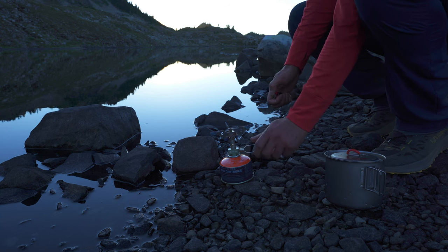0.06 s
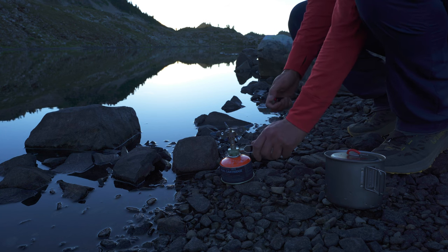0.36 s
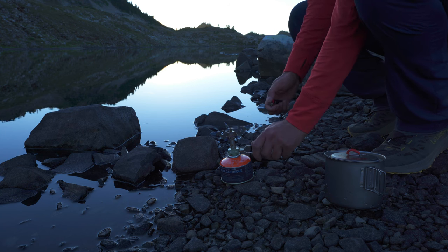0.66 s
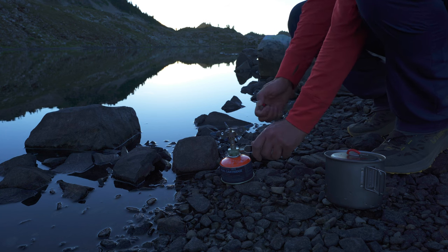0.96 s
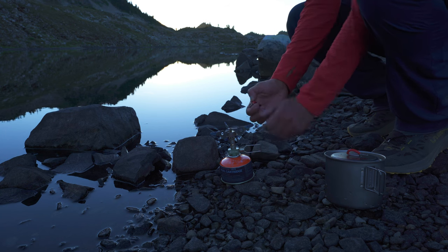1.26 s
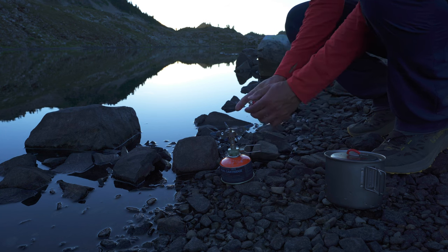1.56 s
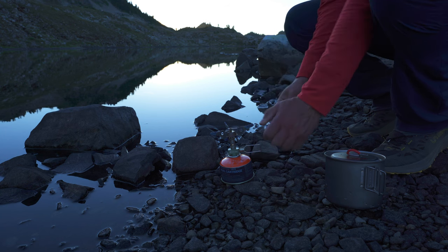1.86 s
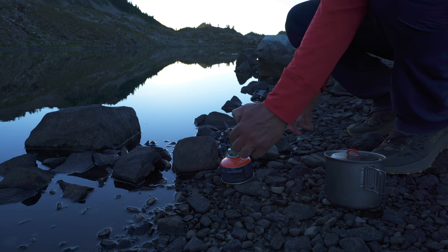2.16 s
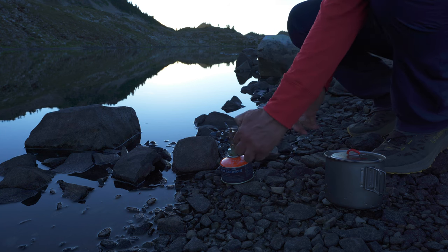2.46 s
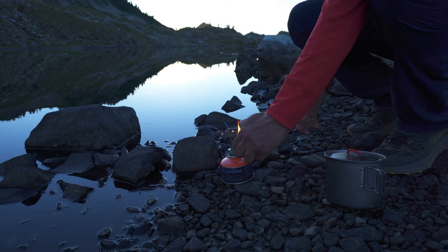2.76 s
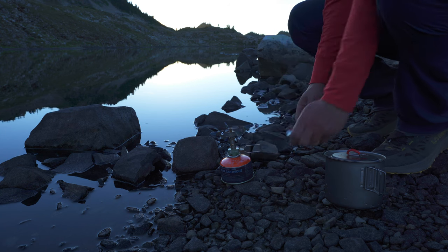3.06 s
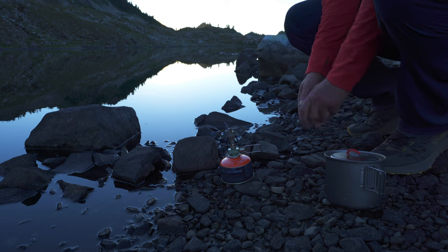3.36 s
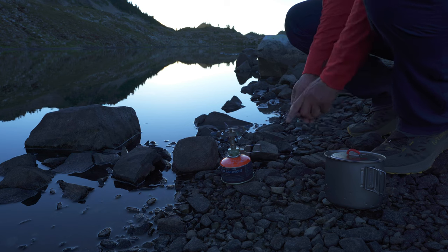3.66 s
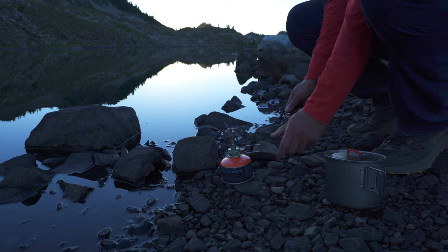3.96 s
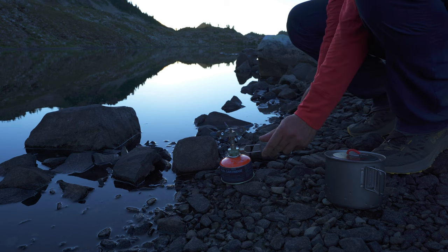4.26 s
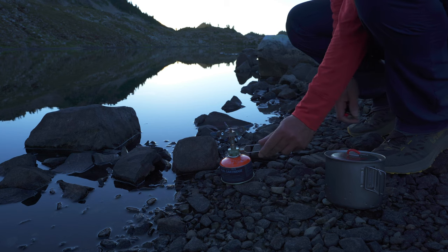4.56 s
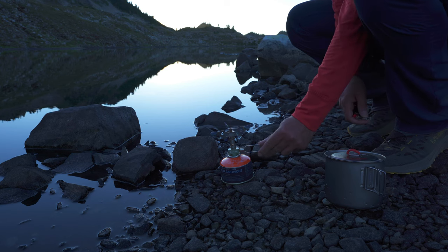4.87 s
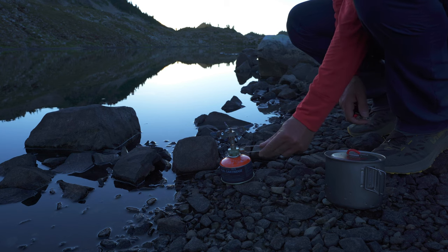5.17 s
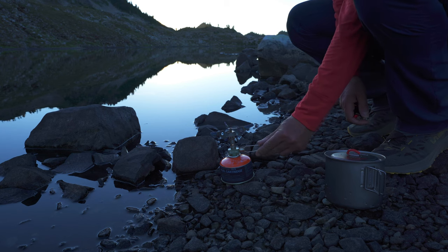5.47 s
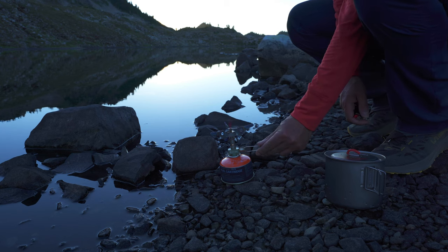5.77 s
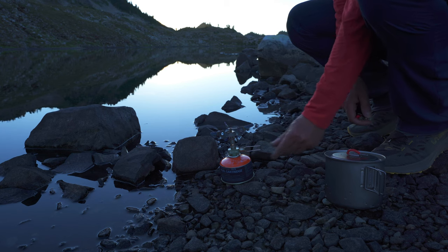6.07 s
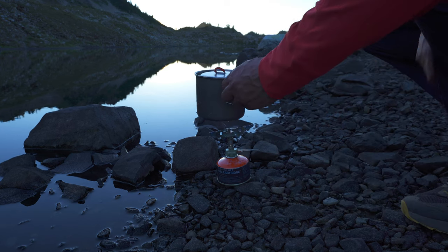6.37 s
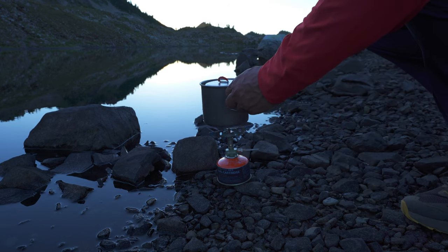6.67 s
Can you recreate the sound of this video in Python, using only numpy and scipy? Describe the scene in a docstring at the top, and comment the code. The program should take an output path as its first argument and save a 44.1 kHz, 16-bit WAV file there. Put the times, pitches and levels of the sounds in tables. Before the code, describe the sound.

Close to the microphone in a quiet outdoor spot, a camping stove starts hissing after a brief rustle of clothes, small stone clicks and a knock from its valve. One sharp lighter snap sets the gas alight with a quick flutter of puffs. The flame settles into a fuller, steady rush with a soft roar and slight sputter, its tone shifting at the end as a pot comes over it.

```python
"""Stony shore of a still lake: a small gas stove, close to a mono microphone.
Clothing rustles and pebbles click under the crouching cook. The valve opens with a knock and cold
gas hisses through the resonant burner head. A lighter snaps; the gas catches in three puffs and burns
with a soft roar. The valve is opened further, and a pot held over the flame reflects the hiss."""
import sys
import numpy as np
from scipy import signal
from scipy.fft import rfft, irfft, next_fast_len
from scipy.io import wavfile

SR = 44100
rng = np.random.default_rng(int(sys.argv[2]) if len(sys.argv) > 2 else 0)


def inscribe(sig):
    """Save sig as 16-bit PCM at rate SR to the path in sys.argv[1].

    A 1-D sig is mono; a 2-D sig holds one channel per row.
    Samples are clipped to [-1, 1] before scaling.
    """
    pcm = np.round(np.clip(np.atleast_2d(sig).T, -1, 1) * 32767)
    wavfile.write(sys.argv[1], SR, pcm.astype(np.int16))


N = 301203

# gas flow through the valve, as the base level of hiss and roar: t/s, level/dB
GAS_FLOW = [(0.35, -69), (0.55, -54.5), (0.68, -51.5), (0.8, -45.5), (1.0, -42), (2.3, -43), (2.8, -45.5),
            (3.35, -44.0), (4.15, -44.5), (4.35, -46.0), (5.55, -43), (5.8, -42.0), (6.83, -42.5)]


def from_db(db):
    """Decibels to gain."""
    return 10 ** (np.asarray(db) / 20)


def rms_one(x):
    """Scale to an rms of 1."""
    return x / np.sqrt(np.mean(x ** 2) + 1e-20)


def in_time(curve):
    """A curve of (t/s, value) points, sample by sample."""
    times, values = np.transpose(curve)
    return np.interp(np.arange(N) / SR, times, values)


def bin_hz():
    """Frequencies on which sound is coloured."""
    return np.maximum(np.fft.rfftfreq(next_fast_len(N, True), 1 / SR), 1)


def slope(points):
    """A spectrum in dB, joined on a log-frequency axis; it falls away below its first point."""
    hz, db = np.transpose(points)
    bass_loss_db = 40 * np.log10(np.minimum(bin_hz() / hz[0], 1))
    return np.interp(np.log(bin_hz()), np.log(hz), db) + bass_loss_db


def bells(rows):
    """Peaks and notches (f/Hz, width/Hz, gain/dB), summed in dB."""
    return sum(db / (1 + (2 * (bin_hz() - hz) / width) ** 2) ** 2 for hz, width, db in rows)


def coloured(x, db):
    """Filter by a gain in dB at each frequency."""
    size = next_fast_len(N, True)
    return irfft(rfft(x, size) * from_db(db), size)[:N]


def noise(db):
    """Noise of a given colour, rms 1."""
    return rms_one(coloured(rng.standard_normal(N), db))


def drift(rate_hz):
    """Random wandering, mostly slower than the rate, rms 1."""
    return noise(-20 * np.log10(1 + (bin_hz() / rate_hz) ** 2))


def high_pass(x, hz, order=2):
    """Small sources radiate little bass."""
    return signal.sosfilt(signal.butter(order, hz, "high", fs=SR, output="sos"), x)


def pulse(s, db, decay_s):
    """A pointed push of air, falling off exponentially on both sides."""
    return from_db(db) * np.exp(-np.minimum(np.abs(np.arange(N) / SR - s) / decay_s, 20))


def add(out, s, sound):
    """Mix a short sound in at a time."""
    at = max(int(s * SR), 0)
    out[at:at + len(sound)] += sound[:N - at]


def open_air(gain_db=4.5):
    """The air over the shore stirs with a faint rumble."""
    breeze = [(0, -51), (.5, -54.5), (.65, -58), (1.05, -55.5), (1.9, -58), (2.5, -60.5)]  # strength of the stir: t/s, relative level/dB
    rumble = [(18, -14), (35, -6.5), (75, 1), (110, -1), (160, -8), (300, -14.5), (600, -28.5),
              (1500, -29.5), (6000, -43), (15000, -41)]  # its spectrum: f/Hz, density/dB
    return from_db(gain_db + in_time(breeze)) * noise(slope(rumble))


def clothing(gain_db=-3.5):
    """The cook's clothes shift with a dull rustle in the first second."""
    sleeve = [(0, -49.5), (.2, -50.5), (.4, -49.5), (.55, -54), (.75, -57), (1.0, -81)]  # movement of the cloth: t/s, relative level/dB
    rustle = [(60, -15), (130, -1.5), (220, 0), (350, -3.5), (500, -30), (900, -24), (3000, -49)]  # its spectrum: f/Hz, density/dB
    return from_db(gain_db + in_time(sleeve)) * noise(slope(rustle))


def trickle():
    """Seeping gas sings in the burner head: a thin, steady whistle, soon drowned by the jet."""
    hz, width_hz, db = (5020, 400, -67.5)  # the resonance: f/Hz, width/Hz, level/dB
    return from_db(db) * noise(-20 * np.log10(1 + (2 * (bin_hz() - hz) / width_hz) ** 2))


def snaps():
    """Valve, grit and lighter make small hard contacts: bursts in one band that die at once."""
    # dry snaps: t/s, starting level/dB, centre f/Hz, width/octaves, t60/s
    contacts = [(.0825, -44, 3700, 0.98, .025), (.0838, -56, 8700, .3, .035), (.1478, -52, 10500, 1.0, .03),
                (.151, -53, 4500, 2.2, 0.11), (.3689, -40.5, 11000, 0.76, .012),
                (0.3693, -42, 4200, 0.62, 0.015), (2.6167, -35, 696, 1.5, 0.018),
                (2.6168, -19, 5600, 0.89, 0.0096), (2.617, -27, 2700, 0.92, .008),
                (2.619, -29, 7000, 1.2, .009)]
    out, t = np.zeros(N), np.arange(SR // 5) / SR
    for s, db, hz, octaves, t60 in contacts:
        edge_ratio = 2 ** (octaves / 2)
        edges_hz = [hz / edge_ratio, min(hz * edge_ratio, SR / 2 - 1000)]
        band = signal.butter(2, edges_hz, "band", fs=SR, output="sos")
        burst = rms_one(signal.sosfilt(band, rng.standard_normal(len(t))))
        add(out, s, from_db(db) * burst * np.exp(-np.log(1000) * t / t60))
    return out


def pebbles(contact_s=0.00031):
    """Stones knock underfoot; each click builds over the contact and rings in two close modes."""
    clicks = [(.0828, -35, 1310, .04), (.1158, -26.5, 1270, 0.017), (0.121, -44, 1270, 0.14),
              (1.7298, -21.5, 1760, 0.025), (1.7345, -31, 1760, 0.014)]  # stone on stone: t/s, relative level/dB, f/Hz, t60/s
    modes = [(1, 0.5), (1.16, -9.5)]  # a pebble's ring: frequency ratio, gain/dB
    out, t = np.zeros(N), np.arange(SR // 5) / SR
    for s, db, hz, t60 in clicks:
        ring = sum(from_db(mode_db) * np.sin(2 * np.pi * hz * ratio * t) for ratio, mode_db in modes)
        attack = 1 - np.exp(-(t / contact_s) ** 2)
        ping = from_db(db) * ring * attack * np.exp(-np.log(1000) * t / t60)
        add(out, s, high_pass(ping, 0.89 * hz, order=6))
    return out


def valve_knock():
    """The valve turns with one dull knock: a sharp point on a broader foot, coloured by the canister."""
    # the blow: t/s, point level/dB, point decay/s, foot level/dB, foot decay/s
    (s, point_db, point_s, foot_db, foot_s), = [(0.3715, -22, 0.00015, -33.5, 0.00098)]
    canister = [(294, 290, 5.5), (1160, 340, 3.5), (1680, 770, -16), (2340, 500, 12.5), (3180, 900, 11),
                (4300, 700, -4), (6500, 2500, -7)]  # its hollow body: f/Hz, width/Hz, gain/dB
    blow = pulse(s, point_db, point_s) + pulse(s, foot_db, foot_s)
    return high_pass(coloured(blow, bells(canister)), hz=150)


def jet_levels(lit, full_flow_db=-42.5, trickle_db=-55, sputter_db=1.28, waver_db=0.41):
    """Levels in dB of hiss, whistle, sizzle and spray: all ride on the flow, and the treble grows most."""
    # cold whistle, sizzle and spray: level over the hiss at full flow/dB, dB gained per dB of flow
    cold_treble = [(2.5, .14), (-3.5, 0.6), (-4, 0.5)]
    lit_whistle = [(2.75, 3), (3.7, 3.5), (4.35, 2.5), (5.02, 5.5), (5.55, 3.5), (5.72, 3.5), (6.05, 2)]  # whistle band once lit: t/s, level over the hiss/dB
    lit_sizzle = [(2.75, -3.5), (3.35, 0.5), (3.65, -4), (3.79, 2.5), (4.17, 2), (4.29, -2), (4.7, -2.5),
                  (4.85, -0.5), (4.95, -7), (5.11, 4), (5.22, -4), (5.7, -3.5), (5.82, 3.5), (6.05, 1.5),
                  (6.67, -6)]  # sizzle band once lit: t/s, level over the hiss/dB
    lighter_hand = [(2.3, 0), (2.55, 1), (2.65, 1), (2.8, 0.15)]  # the hand with the lighter screens the burner: t/s, share 0-1
    screen_losses = [2, 1.5, -2.5, -1.2]  # what that hand takes from each band: loss/dB
    flow_db, sizzle_db, screened = in_time(GAS_FLOW), in_time(lit_sizzle), in_time(lighter_hand)
    throttle_db = np.maximum(flow_db, trickle_db) - full_flow_db
    cold_db = [db + per_db * throttle_db for db, per_db in cold_treble]
    spray_db = -2.0 + 0.6 * throttle_db + 0.099 * sizzle_db
    lit_db = [in_time(lit_whistle), sizzle_db, spray_db]
    # the upper bands waver together; once lit, each also sputters on its own
    waver = waver_db * drift(rate_hz=3.4)
    treble_db = [waver + (1 - lit) * cold + lit * (hot + sputter_db * drift(rate_hz=7.1))
                 for cold, hot in zip(cold_db, lit_db)]
    return [flow_db + db - loss_db * screened for db, loss_db in zip([0] + treble_db, screen_losses)]


def turbulence(colour_db, band_db):
    """Rushing gas of one colour, in four steep-sided bands that each follow their own level."""
    bands = [(100, 4200), (4200, 7000), (7000, 9300), (9300, 20000)]  # hiss, whistle, sizzle and spray: low f/Hz, high f/Hz
    hz = bin_hz()
    skirts = [-10 * np.log10((1 + (low / hz) ** 40) * (1 + (hz / high) ** 40)) for low, high in bands]
    return sum(from_db(db) * noise(colour_db + skirt) for db, skirt in zip(band_db, skirts))


def jet(flicker, gain_db=-0.02, flutter_db=0.49, flicker_db=0.48):
    """Gas rushes through the burner head; heat and then the pot's base change its colour."""
    cold_jet = [(150, -17.5), (700, -10), (950, -10.5), (1500, -12), (2000, -4.5), (3300, -7.5), (4600, 1),
                (6000, -9), (8000, -19), (9900, -18), (11500, -24.5), (13000, -31), (14500, -29),
                (15600, -25.5)]  # jet noise before the gas catches: f/Hz, density/dB
    lit_jet = [(300, -39), (950, -9.5), (1500, -3.5), (2000, -4), (3300, -5), (4600, 0), (6000, -0.6),
               (8000, -5), (9900, -11.5), (11500, -11.5), (13000, -25), (14500, -19), (15600, -16)]  # jet noise once lit: f/Hz, density/dB
    burner = [(1078, 113, -4, 7.5), (1377, 460, 1, 7.5), (1710, 150, 0, 3.5), (2280, 1100, 1.5, 5),
              (2880, 730, 4, 5.5), (3657, 620, 4.5, 6.5), (4960, 300, 6.5, 7.5), (5460, 210, 4, 2),
              (6370, 230, 9.5, 3.5), (6680, 220, 6, 5.5), (7370, 600, 1.5, 6.5), (8080, 170, 8.5, -0.5),
              (8450, 330, 6.5, 8.5), (8950, 450, 9, 6.5), (9200, 150, -6, -1), (9340, 330, 1.5, 7),
              (10380, 700, 8.5, 10)]  # resonances of the head: f/Hz, width/Hz, cold gain/dB, lit gain/dB
    pot_base = [(960, 210, 10), (2280, 560, 2), (4580, 600, 3.5), (5020, 300, -9), (5350, 500, 3.5),
                (6760, 760, -15), (7520, 350, -8), (8450, 730, -8), (9840, 700, 12), (11700, 700, -1),
                (13300, 900, 7), (15500, 1200, -1)]  # peaks and notches of the bounce off the pot: f/Hz, width/Hz, gain/dB
    alight = [(2.62, 0), (2.92, 1)]  # how much of the burner is alight: t/s, share 0-1
    pot_over = [(6.12, 0.02), (6.3, .8), (6.65, 0.98)]  # how far the pot covers it: t/s, share 0-1
    lit, covered = in_time(alight), in_time(pot_over)
    band_db = jet_levels(lit)
    cold_db = slope(cold_jet) + bells([(hz, width, cold) for hz, width, cold, _ in burner])
    lit_db = slope(lit_jet) + bells([(hz, width, hot) for hz, width, _, hot in burner])
    under_pot_db = lit_db + bells(pot_base)
    states = [(1 - lit, cold_db), (lit * (1 - covered), lit_db), (lit * covered, under_pot_db)]
    rush = sum(np.sqrt(share) * turbulence(colour, band_db) for share, colour in states)
    # the jet flutters a little by itself, and more with the flame on it
    return rush * from_db(gain_db + flutter_db * drift(rate_hz=91) + flicker_db * lit * flicker)


def hand_echo(gas, echo_db=-11, delay_s=0.00089, sway_s=0.00006, centre_hz=8500, width_hz=4000):
    """The treble glances off the hand at the valve; as the hand sways, ripples slide through the hiss."""
    hand_near = [(1.9, .2), (2.6, 1), (3.1, 0.9), (3.5, 0.4), (4.2, 1), (6.0, 1), (6.3, .3)]  # the hand by the burner: t/s, nearness 0-1
    glance = coloured(gas, echo_db - 10 * np.log10(1 + (2 * (bin_hz() - centre_hz) / width_hz) ** 4))
    # the changing delay is read from an oversampled copy, which keeps the treble
    fine = signal.resample_poly(glance, 4, 1)
    read_at = np.arange(N) - SR * (delay_s + sway_s * drift(rate_hz=1.7))
    return in_time(hand_near) * np.interp(read_at, np.linspace(0, N, len(fine), endpoint=False), fine)


def ignition_puffs():
    """The first pockets of gas burn in single pushes, each followed by a shallow suction."""
    pockets = [(2.643, -25.5, .0013), (2.686, -25, 0.0021), (2.7345, -20, 0.00058)]  # gas catching: t/s, level/dB, decay/s
    return high_pass(sum(pulse(*pocket) for pocket in pockets), hz=90)


def flame(flicker, gain_db=0.02, flicker_db=0.85, catch_s=2.672, spread_s=0.047):
    """Unsteady burning gives a low roar, fed by the gas flow, as the flame spreads round the head."""
    vigour = [(2.72, 6), (2.95, 12.5), (3.08, 8.5), (3.17, 10.5), (3.95, 10), (4.18, 12), (4.5, 9.5),
              (4.66, 13), (5.7, 9.0), (6.55, 11.0), (6.8, 8.5)]  # strength of the burning: t/s, level over the gas flow/dB
    roar = [(25, -22.5), (60, -14), (125, -3.5), (190, -0.5), (245, 1), (295, -2.5), (385, 0), (490, -3.5),
            (600, -10.5), (740, -10.5), (860, -19.5), (1000, -28), (2000, -63)]  # its spectrum: f/Hz, density/dB
    roar_db = gain_db + in_time(GAS_FLOW) + in_time(vigour) + flicker_db * flicker
    burning = np.clip((np.arange(N) / SR - catch_s) / spread_s, 0, 1)
    return burning * from_db(roar_db) * noise(slope(roar))


def scene():
    """Everything is close to the microphone and dry, alike in both channels."""
    flicker = drift(rate_hz=13)  # shared by jet and flame
    gas = jet(flicker)
    stove = gas + hand_echo(gas) + flame(flicker) + ignition_puffs() + trickle()
    handling = pebbles() + snaps() + valve_knock()
    mono = stove + handling + open_air() + clothing()
    return np.array([mono, mono])


def record(dry, cutoff_hz=15700):
    """The top is cut steeply."""
    return signal.sosfilt(signal.ellip(12, .1, 80, cutoff_hz, fs=SR, output="sos"), dry)


dry = scene()
out = record(dry)
inscribe(out)
```